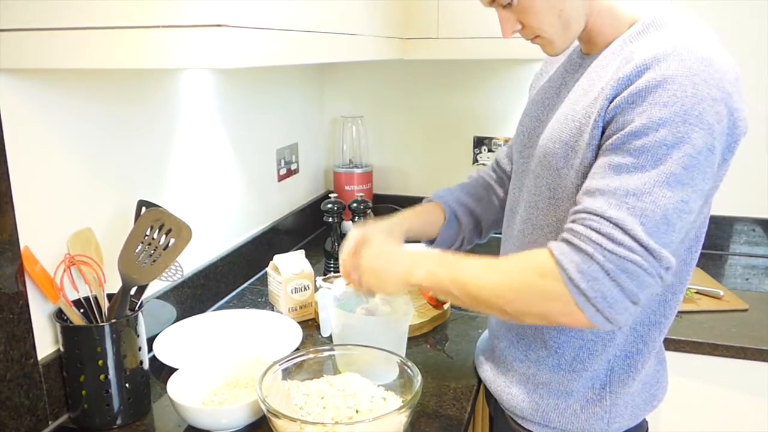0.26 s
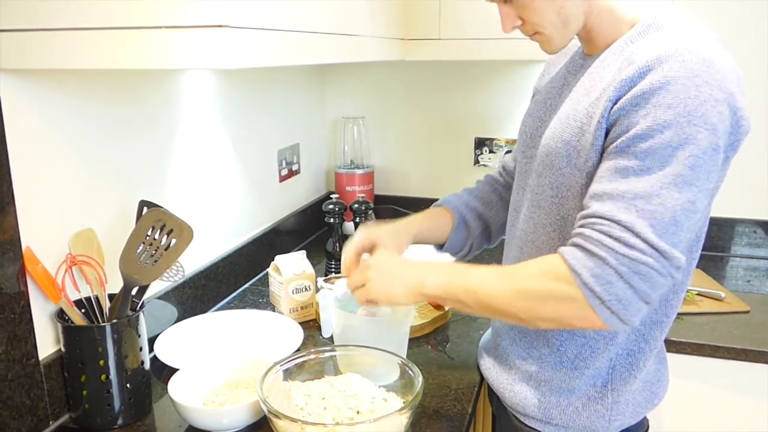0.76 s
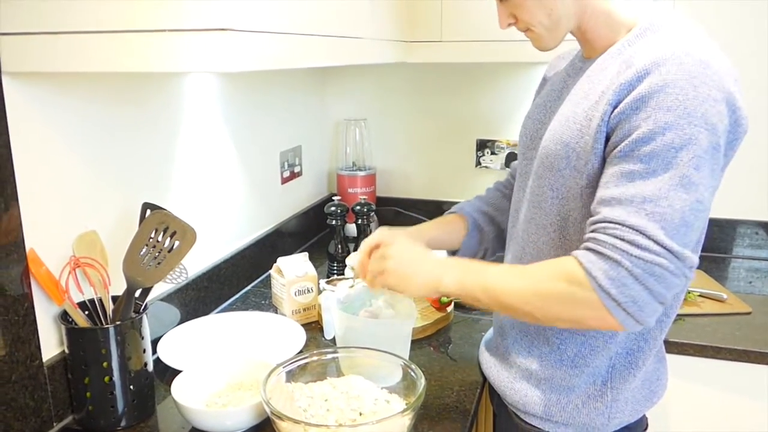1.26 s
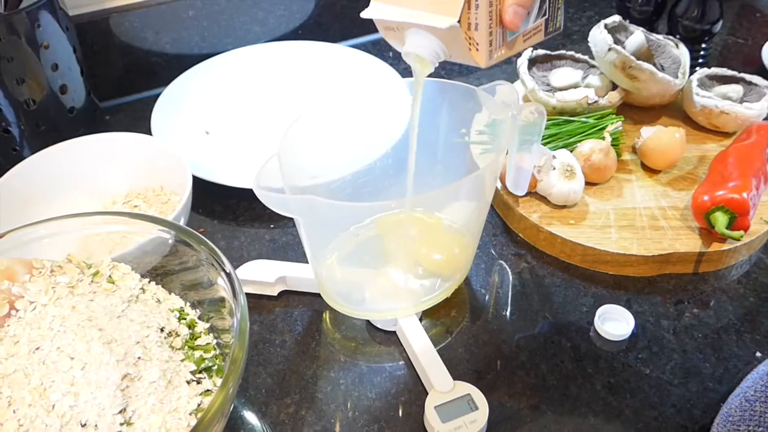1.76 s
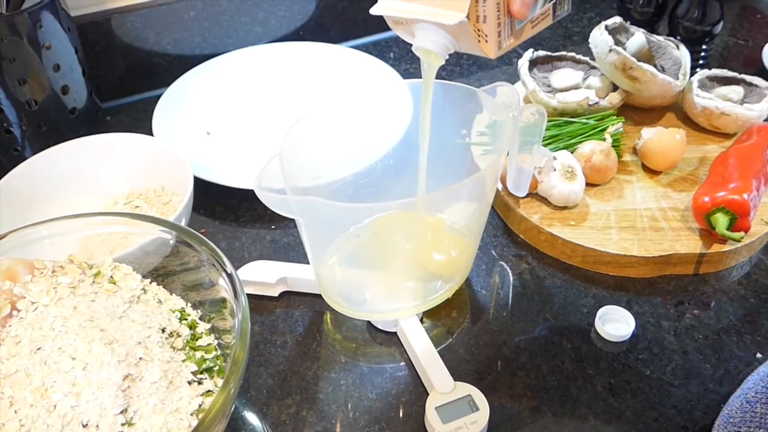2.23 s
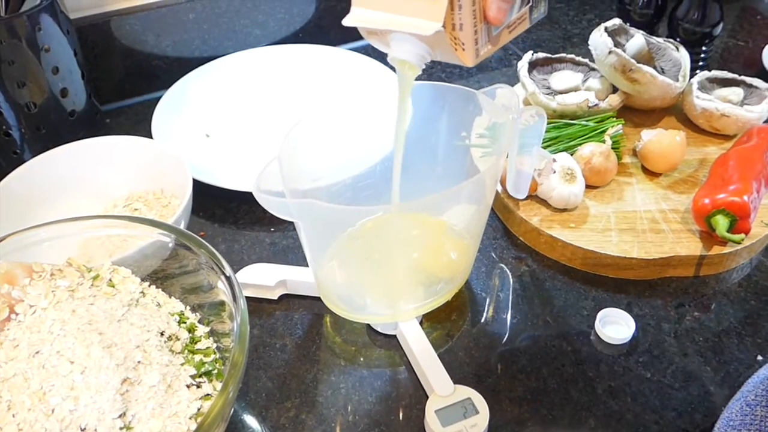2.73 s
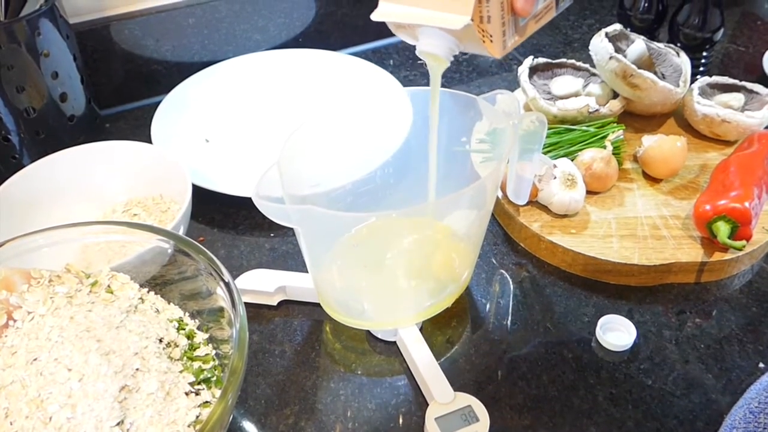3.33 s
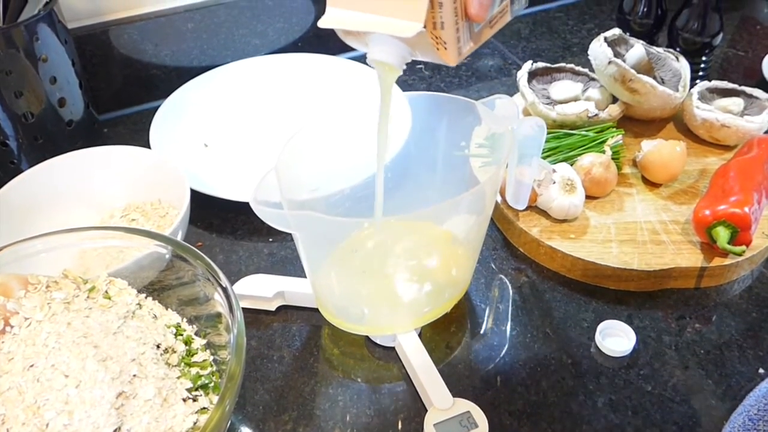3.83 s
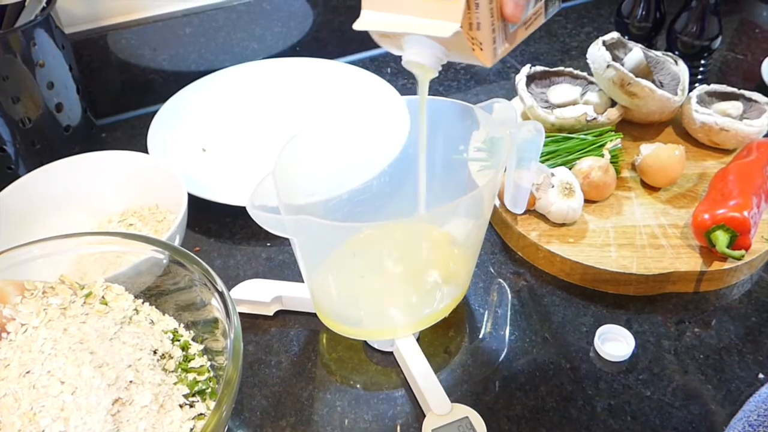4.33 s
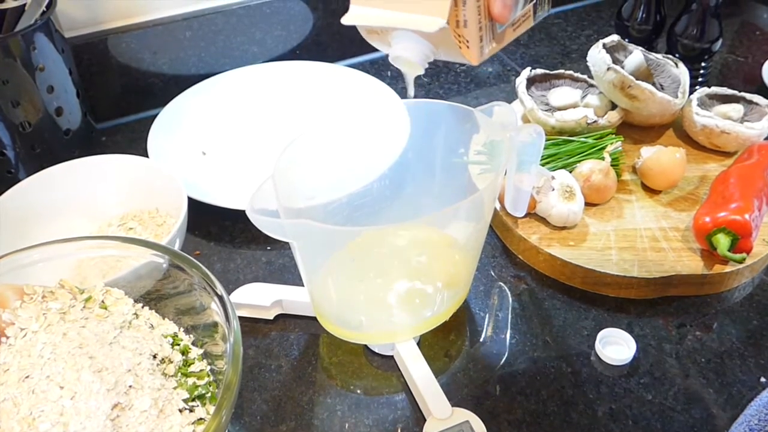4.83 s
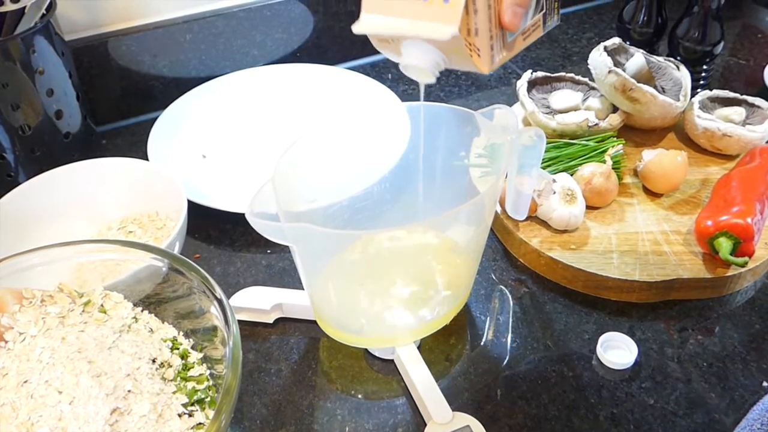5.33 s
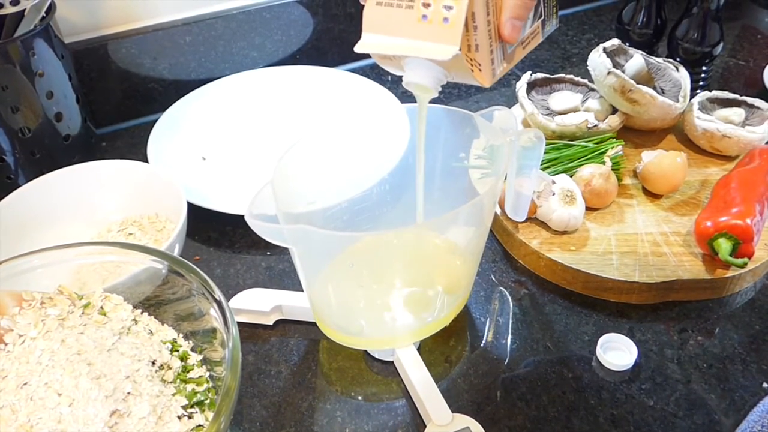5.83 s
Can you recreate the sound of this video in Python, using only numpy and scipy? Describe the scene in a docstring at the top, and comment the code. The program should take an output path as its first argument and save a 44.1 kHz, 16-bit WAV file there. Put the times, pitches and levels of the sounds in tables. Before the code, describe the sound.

In a small tiled kitchen, a dish knocks, sound drops out, gas hisses and ignites with a snap, then a pouring stream drums louder into spray.

```python
"""A quiet, humming small tiled kitchen, heard in stereo from close by; hands crinkle a carton, a dish clatters.
The sound drops out for a moment, then gas hisses from a burner, a spark snaps, and the flame flares and settles.
A stream of liquid drums ever louder in a plastic jug, then breaks up into spray; small ticks fall throughout.
Hiss, flame and liquid are shaped noise; dish and igniter add decaying sines; ticks are short noise bursts.
The tiled walls answer everything but the room tone."""
import sys
import numpy as np
from scipy import signal
from scipy.fft import rfft, irfft, next_fast_len
from scipy.io import wavfile
from scipy.ndimage import uniform_filter1d, map_coordinates

SR = 44100
rng = np.random.default_rng(int(sys.argv[2]) if len(sys.argv) > 2 else 0)


def bounce(signal):
    """Save signal as a 16-bit WAV file at the path given by the first command-line argument."""
    frames = np.transpose(np.atleast_2d(signal))
    limited = np.clip(frames, -1, 1)
    pcm = np.round(limited * 32767).astype(np.int16)
    wavfile.write(sys.argv[1], SR, pcm)


N = 268128


def amp(db):
    """Gain of a dB value."""
    return 10 ** (np.asarray(db) / 20)


def unit(x):
    """x at rms 1."""
    return x / np.sqrt(np.mean(x ** 2) + 1e-20)


def along(points, hz):
    """Read a curve of (f/Hz, value) points on a log frequency axis."""
    f, value = np.transpose(points)
    return np.interp(np.log(hz + 1), np.log(f + 1), value)


def curves(rows):
    """One value per sample for each column after the time."""
    s, *columns = np.transpose(rows)
    return [np.interp(np.arange(N) / SR, s, column) for column in columns]


def after(s, rise):
    """0 before s, then a ramp to 1 lasting rise seconds."""
    return np.clip((np.arange(N) / SR - s) / rise, 0, 1)


def since(s):
    """Seconds since s, 0 before it."""
    return np.maximum(np.arange(N) / SR - s, 0)


def wobble(rate):
    """A smooth random curve, rate knots a second."""
    knots = rng.standard_normal(int(N * rate / SR) + 4)
    return map_coordinates(knots, [np.arange(N) * rate / SR])


def filtered(x, response):
    """x times a response of frequency."""
    m = next_fast_len(N + SR // 2)
    spectrum = rfft(x, m) * response(np.fft.rfftfreq(m, 1 / SR))
    return irfft(spectrum, m)[..., :N]


def ridges(peaks, hz):
    """Level/dB added by resonances of (f/Hz, width/Hz, level/dB)."""
    return sum(db / (1 + (2 * (hz - c) / width) ** 2) for c, width, db in peaks)


# how alike noise reaches the two sides, before rush tightens or widens it: f/Hz, correlation [0 to 1]
LIKENESS = [(100, 0.73), (300, 0.84), (1000, 0.51), (3000, 0.79), (6000, 0.66), (12000, 0.59)]


def rush(colour_db, tight=0, patchy_db=1.22, source=None):
    """Coloured stereo noise of rms 1 with random gain patches; positive tight draws the sides together."""
    pair = rng.standard_normal((2, N)) if source is None else source
    z = signal.stft(pair, nperseg=512)[2]
    patches = uniform_filter1d(rng.standard_normal(z.shape[1:]), 4, 0)  # smooth over frequency
    patches = uniform_filter1d(patches, 8, 1)  # and over time
    pair = signal.istft(z * amp(patchy_db * unit(patches)), nperseg=512)[1][:, :N]

    def mid_side(hz):
        likeness = 1 - (1 - along(LIKENESS, hz)) * (1 - tight)
        turn = np.arccos(np.clip(likeness, -1, 1)) / 2
        return amp(colour_db(hz)) * [np.cos(turn), np.sin(turn)]

    mid, side = filtered(pair, mid_side)
    return unit(np.array([mid + side, mid - side]))


def add(track, s, sound):
    """Mix a sound in at a time."""
    start = round(s * SR)
    track[..., start:start + sound.shape[-1]] += sound


def ring(modes, t, spread_db):
    """Struck modes of (f/Hz, level/dB, t60/s): decaying sines at new strengths for each blow."""
    return sum(amp(db + rng.normal(0, spread_db) - 60 * t / t60) * np.sin(2 * np.pi * hz * t)
               for hz, db, t60 in modes)


def burst(colour, t, t60):
    """A dying puff of coloured noise without bass."""
    hz = np.fft.rfftfreq(len(t), 1 / SR)
    puff = unit(irfft(rfft(rng.standard_normal(len(t))) * amp(colour(hz)), len(t)))
    puff = puff * amp(-60 * t / t60)
    return signal.sosfilt(signal.butter(2, 200, "high", fs=SR, output="sos"), puff)


# spectrum of the quiet kitchen: f/Hz, relative level per Hz/dB
KITCHEN_COLOUR = [(30, -33), (90, -10.5), (200, -7), (280, 0.5), (400, -4.5), (800, -3), (1450, 0.5),
                  (2500, -5.5), (4500, -5.5), (7000, -3.5), (9000, -5.5), (12500, -3), (15300, -6),
                  (15700, -72)]
# appliance hums above it: f/Hz, width/Hz, level added/dB
APPLIANCE_HUMS = [(100, 6, 5.5), (3280, 340, 3.2), (7050, 190, 4)]
# the dropout: start t/s, end t/s; a short fade-out straddles the start
DROPOUT = (1.533, 1.7425)
QUIET_DB = -47


def kitchen():
    """Room tone with an appliance hum: slightly unsteady wide noise, taken away inside the dropout."""
    tone = rush(lambda hz: along(KITCHEN_COLOUR, hz) + ridges(APPLIANCE_HUMS, hz), tight=-0.21)
    unsteady_db = 0.5 * wobble(12)
    return amp(QUIET_DB + unsteady_db) * tone * (1 - after(np.mean(DROPOUT), 0.01))


# crackles of a crinkled card carton: t/s, level/dB, centre f/Hz
CARD_CRACKLES = [(0.22, -43, 2550), (.229, -42, 3130), (.24, -41, 2480), (.25, -41.5, 2440),
                 (0.269, -46, 2700)]
CARD_T60_S, CARD_NARROW_DB = 0.062, 16  # narrowness in dB per octave
# small ticks, probably drops: t/s, level/dB, centre f/Hz, narrowness/dB per octave
DROP_TICKS = [(.786, -44, 3000, 8), (.9444, -47.5, 1800, 6), (3.718, -29, 3200, 5), (3.728, -32, 1900, 11),
              (4.5072, -36, 4970, 9), (4.673, -30.5, 2270, 6.5), (4.715, -38.5, 3150, 18),
              (4.7544, -34, 1570, 14), (5.245, -33, 12400, 26)]
TICK_T60_S = 0.029


def ticks():
    """Carton crackles and small ticks: short noise bursts, each falling off around its own pitch."""
    track, t = np.zeros(N), np.arange(SR // 8) / SR
    events = [(s, db, hz, CARD_NARROW_DB, CARD_T60_S) for s, db, hz in CARD_CRACKLES]
    events += [(*row, TICK_T60_S) for row in DROP_TICKS]
    for s, db, centre_hz, narrow_db, t60 in events:
        puff = burst(lambda hz: -narrow_db * np.abs(np.log2(hz / centre_hz + 1e-3)), t, t60)
        attack = 1 - np.exp(-t / 0.0006)
        add(track, s, amp(db) * puff * attack)
    return track


# dish contacts: t/s, level/dB, t60 of the chatter/s
DISH_CONTACTS = [(1.4481, -34.5, 0.15), (1.4759, -25.5, 0.037), (1.4808, -25, 0.042), (1.4860, -20, 0.027),
                 (1.4942, -31.5, 0.15), (1.5175, -32.5, 0.071)]
# ringing modes of the dish: f/Hz, relative level/dB, t60/s
DISH_MODES = [(1450, -13, .05), (1635, 5, 0.05), (1831, 5, 0.08), (2020, -1, .06), (2290, -15, .06),
              (2505, -7, 0.038), (3594, -14, .06), (3970, -9, 0.054)]
# spectrum of its chatter: f/Hz, relative level per Hz/dB
CHATTER_COLOUR = [(300, -22.5), (900, -10), (1500, -4), (2300, 0), (3000, -8), (5000, -7), (8000, -14),
                  (12000, -12.5), (15500, -31)]


def dish():
    """A dish knocks and chatters on the worktop: each contact is a noise burst plus ringing modes."""
    track, t = np.zeros(N), np.arange(SR // 4) / SR
    attack = 1 - np.exp(-t / 0.0014)
    for s, db, t60 in DISH_CONTACTS:
        chatter = burst(lambda hz: along(CHATTER_COLOUR, hz), t, t60)
        add(track, s, amp(db) * (0.5 * ring(DISH_MODES, t, 2) + chatter) * attack)
    return track


# resonances of the room: f/Hz, width/Hz, level added/dB
ROOM_RESONANCES = [(166, 12, 9), (282, 31, 13.5)]
# spectrum of the unlit gas: f/Hz, relative level per Hz/dB
GAS_COLOUR = [(30, -17.5), (100, -15), (170, -8.5), (230, -7), (550, -2), (1000, -1), (1900, -0.5),
              (3000, -6.5), (4500, -4.5), (6000, -3), (8000, -2.5), (12500, -6), (15300, -10), (15700, -70)]
# whistles in the gas: f/Hz, width/Hz, level added/dB
GAS_WHISTLES = [(990, 120, 3.5), (2950, 65, 8), (5580, 120, 6), (6240, 170, 3.5), (7700, 200, 0)]
GAS_DB = -45  # before the mix


def gas():
    """Cold gas hisses from the dropout on, in place of the room tone: noise with whistles and resonances."""
    hiss = rush(lambda hz: along(GAS_COLOUR, hz) + ridges(ROOM_RESONANCES + GAS_WHISTLES, hz), tight=0.098)
    return amp(GAS_DB + 0.23 * wobble(15)) * hiss * after(np.mean(DROPOUT), 0.01)


SPARK_S = 2.2682
# the snap and its first bounces off hob and tiles: delay t/s, level/dB
BOUNCES = [(0, -9.5), (.0037, -22.5), (.0068, -36.5), (.0088, -41)]
# spectrum of the snap: f/Hz, relative level per Hz/dB
SNAP_COLOUR = [(100, -40), (300, -18), (700, -11), (1500, -11), (2500, -8), (3700, 7), (5400, 0.5),
               (7500, -3), (12500, -4), (15500, -10), (16400, -27)]
# ringing modes of the igniter: f/Hz, relative level/dB, t60/s
IGNITER_MODES = [(343, -18.5, 0.03), (634, -4.5, 0.024), (1550, -8, 0.028), (3360, -1, 0.021),
                 (3830, 1, 0.011), (4280, -4.5, .014), (5570, 1.5, 0.02)]


def spark():
    """A sharp snap that rings the igniter, and its bounces, scattered by the nearest surfaces."""
    track, t = np.zeros(N), np.arange(SR // 10) / SR
    for delay, db in BOUNCES:
        crack = burst(lambda hz: along(SNAP_COLOUR, hz), t, 0.022)
        add(track, SPARK_S + delay, amp(db) * (crack + 0.78 * ring(IGNITER_MODES, t, 1.5)))
    # a small source sends out no bass
    return signal.sosfilt(signal.butter(2, 160, "high", fs=SR, output="sos"), track)


# flare of the gas cloud; rows: rush, boom, fizz
# columns: blaze level/dB, flash above it/dB, sag/dB per s, added fall after the blaze/dB per s
FLARE_LEVELS = [(-30.5, 7, 11, 66), (-38, 18.5, 3.5, 58), (-31.5, 17, 46, 110)]
# spectra of the three rows: f/Hz, relative level per Hz/dB
RUSH_COLOUR = [(1200, -34), (1800, -14), (2600, -10), (3300, -3), (4000, 2.5), (5300, 0.5), (6300, -8),
               (8000, -44)]
BOOM_COLOUR = [(50, -60), (120, -34), (180, -17), (260, 2), (450, 4.5), (700, 7), (1200, 1), (2000, 1.5),
               (3000, -30)]
FIZZ_COLOUR = [(4000, -28), (6300, -2.5), (9000, 0.5), (12500, -3), (15200, -7), (15700, -58.5)]
FLASH_S, BLAZE_ENDS_S = 0.011, 2.462  # time constant of the flash; clock time


def flare():
    """The gas cloud burns off: a flash that dies at once, a sagging blaze, then a steep fall."""
    t = since(SPARK_S)
    rush_db, boom_db, fizz_db = [
        db + flash_db * np.exp(-t / FLASH_S) - sag * t - fall * since(BLAZE_ENDS_S)
        for db, flash_db, sag, fall in FLARE_LEVELS]
    # rush and fizz lean a little to the right
    rushing = amp(rush_db) * rush(lambda hz: along(RUSH_COLOUR, hz), tight=0.3) * amp([[-0.7], [0.7]])
    fizz = amp(fizz_db) * rush(lambda hz: along(FIZZ_COLOUR, hz), tight=0.14) * amp([[-0.9], [0.9]])
    boom = amp(boom_db + 1.8 * wobble(30)) * rush(lambda hz: along(BOOM_COLOUR, hz), tight=0.69)
    return rushing + fizz + boom


# spectrum of the burning jets: f/Hz, relative level per Hz/dB
JET_COLOUR = [(40, -65), (150, -9), (400, -20.5), (1000, -10.5), (2000, 0), (3500, 1), (6000, -1),
              (8000, 0.5), (9200, -3), (12500, -1), (15300, -7), (15700, -70)]
# whistles of the burner: f/Hz, width/Hz, level added/dB
BURNER_WHISTLES = [(1820, 30, 5), (2000, 72, 3.7), (2170, 46, 5.5), (2810, 50, 2.8), (2970, 33, 4.3),
                   (3310, 58, 6.5), (3960, 60, 4.2), (4320, 88, 3.3), (4650, 55, 5.3), (4970, 120, 6.9),
                   (5670, 140, 8), (6700, 110, 4.4), (6930, 100, 5.5)]
FLAME_DB = -42  # before the mix
BREAKUP_S = 5.52  # when the stream breaks up into spray
FULLER_DB = 1  # the broad hiss grows this much from then to the end


def jets():
    """The steady rush of burning jets: noise with the burner's whistles, its level drifting slowly."""
    flame_db = FLAME_DB + 0.6 * wobble(2.59) + 0.05 * wobble(15)
    flame_db += FULLER_DB * after(BREAKUP_S, N / SR - BREAKUP_S)
    return amp(flame_db) * rush(lambda hz: along(JET_COLOUR, hz) + ridges(BURNER_WHISTLES, hz), patchy_db=1.5)


def burner():
    """Cold gas hisses on; after the spark the cloud flares and the jets burn with it."""
    lit = after(SPARK_S, 0.0053)
    return gas() + lit * (jets() + flare())


# strength of the stream in the jug, before surges and mix: t/s, level/dB
STREAM_STRENGTH = [(2.7, -67), (3.5, -56), (4.25, -54), (4.7, -49.5), (5.2, -46.5), (5.45, -42),
                   (5.8, -37.5), (6.08, -36.5)]
# resonances of the jug: f/Hz, width/Hz, relative level/dB
JUG_RESONANCES = [(725, 106, -3), (796, 33, -3), (856.5, 15, 4), (948, 115, 3), (1041, 72, -1),
                  (1092, 38, -2.5)]
# spectrum of the broad splash beside them: f/Hz, relative level per Hz/dB
SPLASH_COLOUR = [(400, -28.5), (600, -2), (1300, 3), (2000, -5), (3000, -21), (5000, -44)]
# spectrum of the jug's base drumming on the worktop: f/Hz, relative level per Hz/dB
THUD_COLOUR = [(40, -55), (100, -27), (170, -5), (280, -6), (430, 5), (550, 0.5), (800, -34)]
# spectrum of the spray: f/Hz, relative level per Hz/dB
MIST_COLOUR = [(1500, -21), (2500, -2), (4000, -1), (5500, 1), (7000, -3), (9000, -6), (12500, -5),
               (15200, -11), (15700, -60)]
SURGE_DB, SURGES_PER_S = 1, 35  # the stream runs unevenly
DEEPENS_DB_PER_OCTAVE = 2  # a weak stream drums the upper resonances, a strong one the lower
BASE_DB, BASE_GROWS = -48.5, 0.75  # the base at the stream's loudest, before the mix; dB per dB of stream
SPRAY_RISE_S, SPRAY_DB, SPRAY_SAG_DB_PER_S = 0.15, -37, 14  # level before the mix


def jug_body(hz):
    """Response/dB of the jug: the powers of its resonances added up."""
    power = sum(amp(2 * db) / (1 + (2 * (hz - c) / width) ** 2) ** 2 for c, width, db in JUG_RESONANCES)
    return 10 * np.log10(power)


def spray():
    """The stream breaks up into spray: wide fluttering noise that rises quickly and sags."""
    spray_db = SPRAY_DB - SPRAY_SAG_DB_PER_S * since(BREAKUP_S) + 0.97 * wobble(36)
    mist = rush(lambda hz: along(MIST_COLOUR, hz), tight=0.05)
    return amp(spray_db) * mist * after(BREAKUP_S - SPRAY_RISE_S, SPRAY_RISE_S)


def jug():
    """The stream tears air under in quick uneven gulps, which drum the jug's resonances and its base."""
    stream_db = curves(STREAM_STRENGTH)[0]
    below_peak_db = stream_db - stream_db.max()
    gulps = rng.standard_normal((2, N)) * amp(1.9 * wobble(80))
    thin, full = [
        rush(lambda hz: jug_body(hz) + tilt_db * np.log2(hz / 900 + 0.1), tight=1.0, patchy_db=1.0, source=gulps)
        for tilt_db in (DEEPENS_DB_PER_OCTAVE, -DEEPENS_DB_PER_OCTAVE)]
    strong = amp(below_peak_db)
    hollow = (1 - strong) * thin + strong * full
    splash = rush(lambda hz: along(SPLASH_COLOUR, hz), tight=0.73, patchy_db=2.0)
    surging_db = stream_db + SURGE_DB * wobble(SURGES_PER_S)
    drumming = amp(surging_db) * (hollow + amp(-0.8) * splash)
    thud = rush(lambda hz: along(THUD_COLOUR, hz) + ridges(ROOM_RESONANCES, hz), tight=0.78)
    thud = amp(BASE_DB + BASE_GROWS * below_peak_db) * thud
    return (drumming + thud) * after(2.6, 0.23) + spray()


# decay of the tiled room: f/Hz, t60/s
WALL_DECAY = [(200, 0.15), (2000, 0.25), (10000, 0.22)]


def walls(x):
    """The room's answer, 3 ms late: noise tails in which each frequency dies at its own speed."""
    hz, t, z = signal.stft(rng.standard_normal((2, SR // 2)), SR, nperseg=256)
    decay = amp(-60 * t / along(WALL_DECAY, hz)[:, None])
    tail = signal.istft(z * decay, SR, nperseg=256)[1]
    tail = tail / np.linalg.norm(tail, axis=1, keepdims=True)
    late = np.pad(x, (130, 0))[None]
    return signal.fftconvolve(late, tail, axes=1)[:, :N]


def scene():
    """All sources; the room answers the hits and colours the steady sounds."""
    snap, knocks, small, steady = spark(), dish(), ticks(), burner() + jug()
    echo = walls(amp(-24.5) * snap + amp(-4.5) * knocks + amp(-2.5) * small + amp(-7) * steady.mean(axis=0))
    return kitchen() + amp(-0.85) * steady + snap + knocks + small + echo


# balance of the microphone's two ports: f/Hz, left over right level/dB
PORT_LEAN = [(200, 0.5), (900, .5), (1500, 2), (3300, 4), (6000, 4.5), (8000, 2.5), (13000, 4),
             (15500, 1.5)]
TOP_HZ = 16494  # nothing is heard from here up


def record(dry):
    """The left port hears more treble; a narrow band near 10 kHz is almost empty; the sound fades and cuts in."""
    def response(hz):
        lean = amp(along(PORT_LEAN, hz) / 2 * [[1], [-1]])
        deep_db = -45 / (1 + ((hz - 10020) / 170) ** 4)
        shoulder_db = -6 / (1 + ((hz - 10050) / 650) ** 2)
        bass_cut = hz / np.hypot(hz, 40)
        return lean * amp(deep_db + shoulder_db) * bass_cut * (hz < TOP_HZ)

    fade_out = (1 - after(DROPOUT[0] - 0.012, 0.029)) ** 2
    cut_in = after(DROPOUT[1], 0.0011)
    return filtered(dry * (fade_out + cut_in), response)


dry = scene()
out = record(dry)
bounce(out)
```